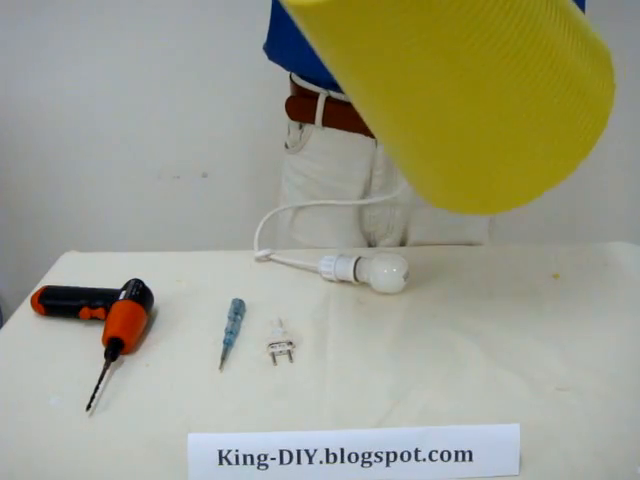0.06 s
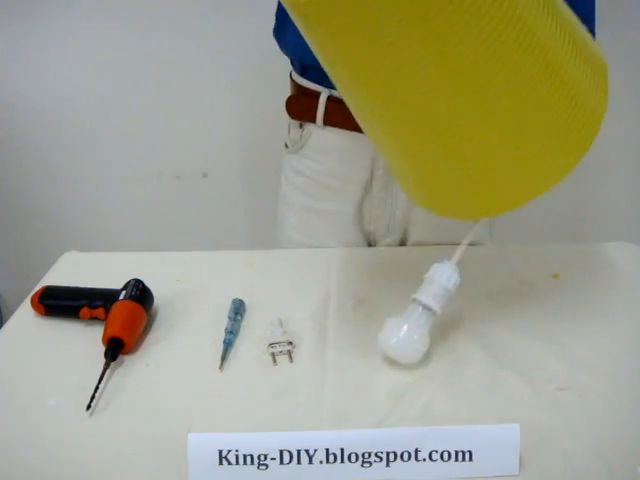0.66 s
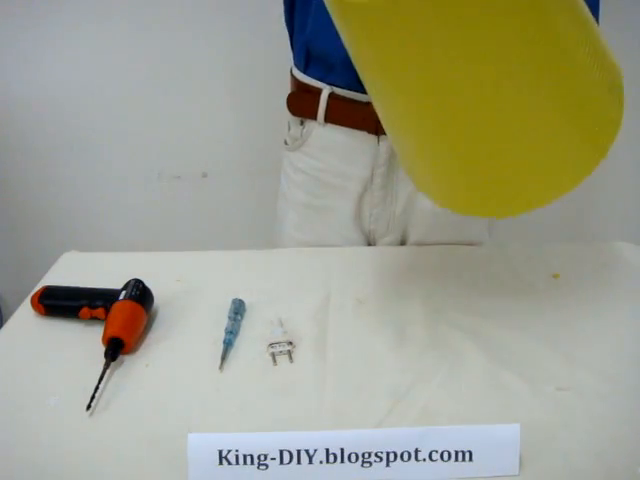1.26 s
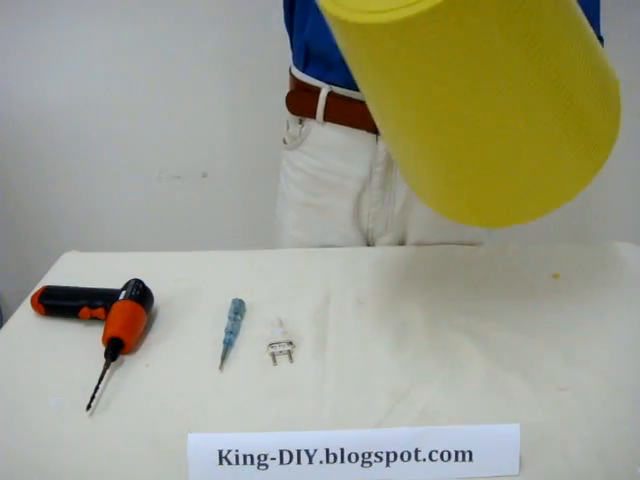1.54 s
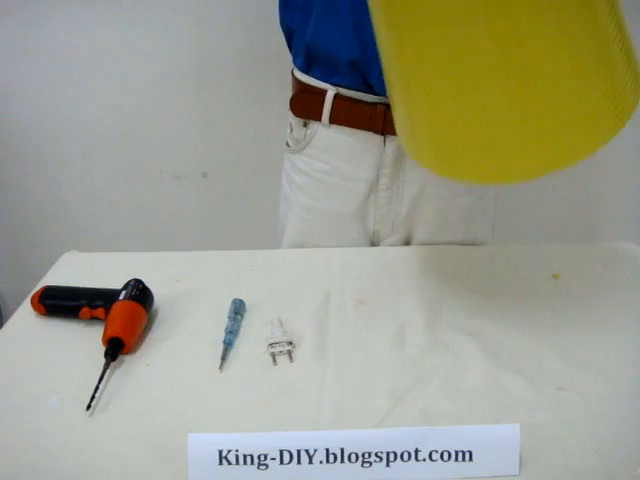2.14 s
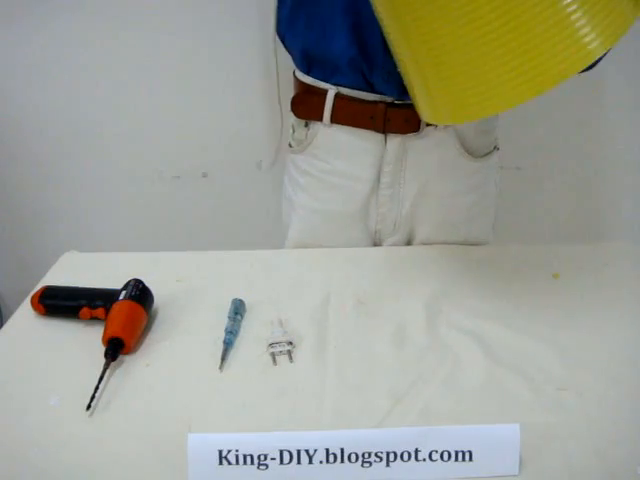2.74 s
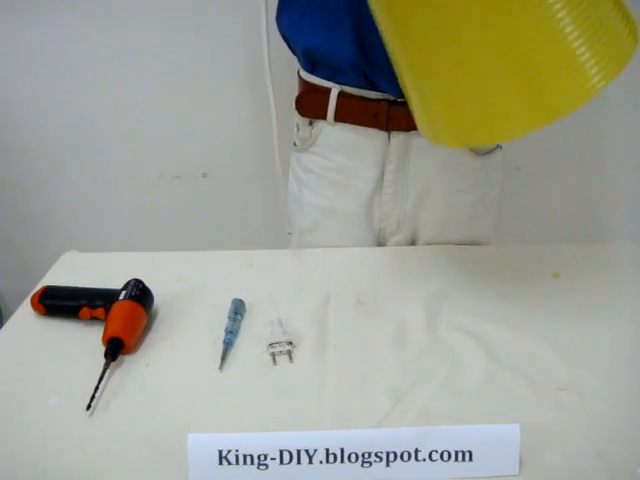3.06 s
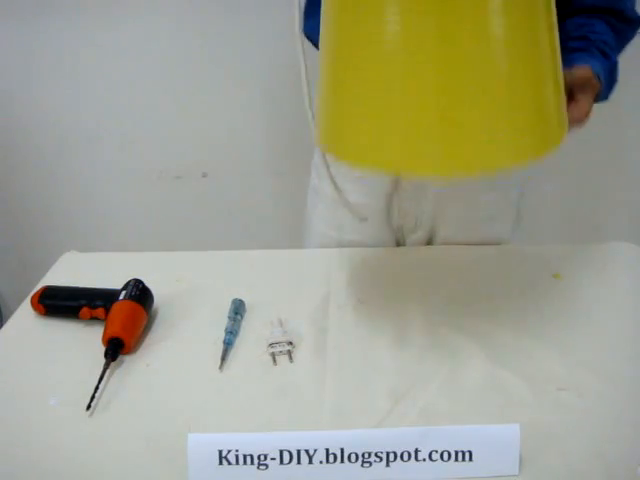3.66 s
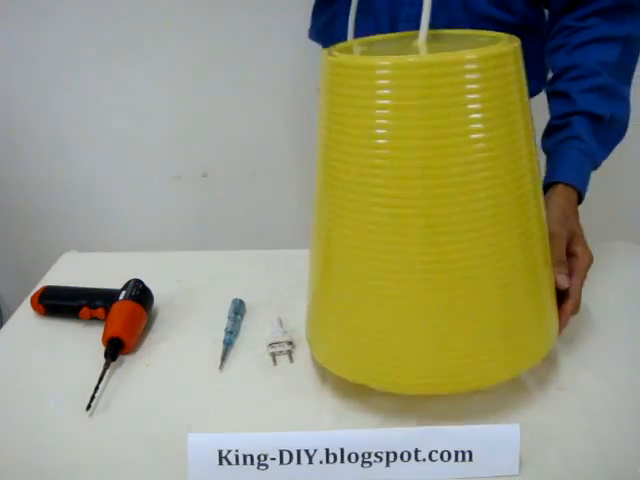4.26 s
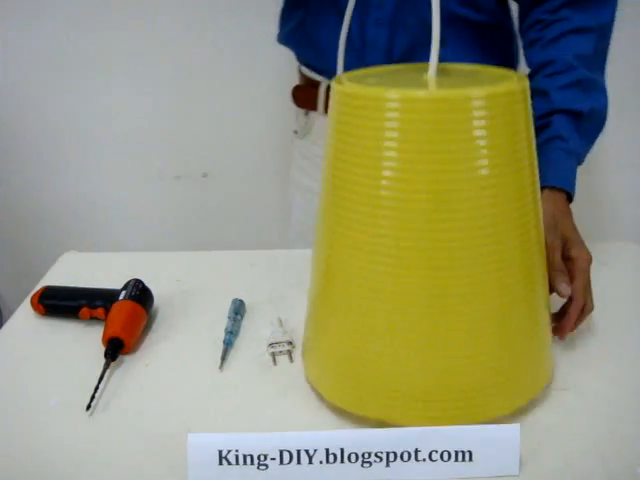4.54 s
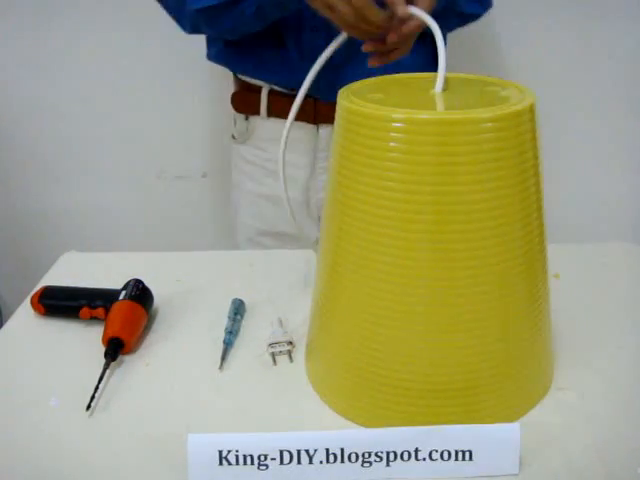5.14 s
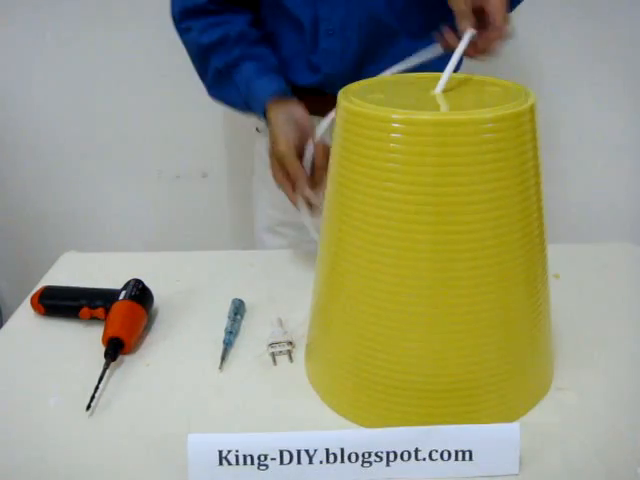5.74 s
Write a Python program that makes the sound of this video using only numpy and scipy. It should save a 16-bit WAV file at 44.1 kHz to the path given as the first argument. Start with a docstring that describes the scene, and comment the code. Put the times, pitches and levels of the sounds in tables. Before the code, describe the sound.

A cord scrapes and judders through a hole in a plastic basket while a dangling bulb clacks against the wall. The scraping stops, then briefly returns amid more knocks as the basket is turned. It lands on its rim on a covered table with a dull, hollow boom, followed by faint brushing. The room is small and slightly echoing, with constant microphone hiss and a faint hum.

```python
"""A lamp cord pulled through a plastic basket

In a small, hard room a cord rasps by stick-slip friction through the base of a large plastic basket.
The lamp slides off the table and knocks about inside, exciting the modes of the shell and the bulb.
Hands turn the basket over and set it on its rim on the cloth-covered table, where the trapped air
booms and sleeves brush by. A small camera hisses throughout, over a faint hum."""
import sys
import numpy as np
from scipy import signal
from scipy.fft import rfft, irfft
from scipy.io import wavfile

SR = 44100
rng = np.random.default_rng(int(sys.argv[2]) if len(sys.argv) > 2 else 0)


def wav_out(sig):
    """Save sig, one row per channel (or a flat mono array), as 16-bit PCM at SR to the path in sys.argv[1]."""
    wavfile.write(sys.argv[1], SR, np.round(np.clip(np.atleast_2d(sig).T, -1, 1) * 32767).astype(np.int16))


N = 264600
TIME = np.arange(N) / SR

# spectrum of plastic struck or brushed: (frequency [Hz], level [dB])
CONTACT_SPECTRUM = [(100, -36), (600, -6.5), (1200, 0.5), (2000, -5.5), (2700, -3), (3700, -4.5),
                    (4900, -6), (6500, -11.5), (10000, -14.5)]
SLIDE_START_S, SLIDE_LENGTH_S = 0.242, 0.21  # the lamp slides, then lifts off
DRAG_LENGTH_S = 1.838  # between pulls the cord creeps on until it is through


def gain_of(db):
    """Amplitude ratio of a level in decibels."""
    return 10 ** (np.asarray(db) / 20)


def unit_rms(x):
    """Normalisation to an rms of one."""
    return x / np.sqrt(np.mean(x ** 2) + 1e-20)


def curve_at(points, hz):
    """Interpolation of (frequency [Hz], value) points on a logarithmic frequency axis."""
    frequency, value = np.transpose(points)
    return np.interp(np.log(hz + 1), np.log(frequency + 1), value)


def add(mix, s, sound):
    """Superposition of a sound on the mix from time s."""
    part = mix[max(round(s * SR), 0):][:len(sound)]
    part += sound[:len(part)]


def colour(x, spectrum, size=2048):
    """Spectral shaping by a minimum-phase filter of unit energy."""
    log_gain = np.log(gain_of(curve_at(spectrum, abs(np.fft.fftfreq(size, 1 / SR)))))
    taps = np.fft.ifft(np.exp(np.conj(signal.hilbert(log_gain)))).real[:size // 2]
    return signal.fftconvolve(x, taps / np.linalg.norm(taps))[:len(x)]


def resonate(x, hz, width_hz):
    """Forced resonance with steep skirts: two band-passes in series, scaled to unit rms."""
    b, a = signal.iirpeak(hz, hz / width_hz, SR)
    return unit_rms(signal.lfilter(b, a, signal.lfilter(b, a, x)))


def ringing(x, modes):
    """Free vibration: each mode excited by x decays exponentially."""
    t = np.arange(SR) / SR
    ring = sum(gain_of(db) * np.exp(-np.log(1000) * t / t60) * np.cos(2 * np.pi * hz * t)
               for hz, db, t60 in modes)
    return signal.fftconvolve(x, ring)[:N]


def swell(t, peak_s):
    """A critically damped pulse, reaching one at peak_s."""
    u = np.maximum(t, 0) / peak_s
    return u * np.exp(1 - u)


def unsteady(span_s, depth_db):
    """Random amplitude modulation: a gain that wanders over span_s."""
    window = signal.windows.hann(int(span_s * SR))
    drift = unit_rms(signal.fftconvolve(rng.standard_normal(N), window, "same"))
    return unit_rms(gain_of(depth_db * drift))


def stroke(start_s, length_s, release_s=0.056):
    """Envelope of a sliding motion: acceleration, steady speed, exponential coasting."""
    t = TIME - start_s
    attack_s = 0.11 * np.sqrt(length_s)
    attack = np.sin(np.pi / 2 * np.clip(t / attack_s, 0, 1)) ** 2
    return attack * np.exp(-np.maximum(t - length_s, 0) / release_s)


def slips(per_s, spread_db, smooth=1.0):
    """Stick-slip friction: random impulses of uneven size over a smooth rub."""
    size = gain_of(spread_db * np.minimum(rng.exponential(1, N), 4))
    train = size * rng.choice([-1, 1], N) * (rng.random(N) < per_s / SR)
    return unit_rms(unit_rms(train) + smooth * rng.standard_normal(N))


def pulling(creep_db=-43):
    """Friction grows with sliding speed; the strongest pull sets the rasp and groan envelopes."""
    # pulls of the cord: (start [s], length [s], rasp [dB], groan [dB], gain in speed [dB/s])
    pulls = [(-.06, 0.077, -29.5, -36, -9), (0.274, .36, -28.5, -60, 6.5), (0.638, 0.44, -32, -36, 3.5),
             (1.251, 0.16, -34, -43, 2), (1.34, 0.32, -37, -26, -11.5), (3.065, 0.074, -36, -38, 54),
             (3.176, 0.13, -32.5, -45, -16), (3.52, 0.025, -37, -40, -5)]
    rasp = gain_of(creep_db) * stroke(-0.075, DRAG_LENGTH_S)
    groan = np.zeros(N)
    for start_s, length_s, rasp_db, groan_db, db_per_s in pulls:
        speed = stroke(start_s, length_s) * gain_of(db_per_s * np.clip(TIME - start_s, 0, length_s))
        rasp = np.maximum(rasp, gain_of(rasp_db) * speed)
        groan = np.maximum(groan, gain_of(groan_db) * speed)
    return rasp, groan


def cord():
    """Stick-slip friction forces vibration: the hole's edge rasps, the wall judders, the base groans."""
    # the cord rubbing the edge: (frequency [Hz], level [dB])
    rasp_spectrum = [(70, -39), (160, -15.5), (400, -1), (850, -1), (1250, 7.5), (1700, 4), (2400, -3.5),
                     (3300, -10.5), (4000, -15.5), (5300, -23.5), (7500, -35.5), (10000, -59)]
    # the bright fizz of fast sliding: (frequency [Hz], level [dB])
    fizz_spectrum = [(300, -36), (1200, -9), (2300, 3), (3200, 2.5), (3900, -11), (4500, -10.5),
                     (5500, -15.5), (10000, -22.5)]
    rasp, groan = pulling()
    judder = rasp ** 0.53 * unsteady(span_s=0.038, depth_db=3.5)  # grows more slowly than the rasp
    grip = unsteady(span_s=0.033, depth_db=1.2)  # the cord catches and lets go
    drive = grip * slips(per_s=630, spread_db=0, smooth=0.69)
    fizz = grip * colour(slips(per_s=530, spread_db=-4), fizz_spectrum)
    hanging = stroke(SLIDE_START_S + SLIDE_LENGTH_S, DRAG_LENGTH_S)
    sway = hanging * resonate(drive, hz=125, width_hz=20)  # the hanging lamp shakes the basket
    edge = colour(drive, rasp_spectrum)
    wall = resonate(drive, hz=276.4, width_hz=69)
    base = resonate(drive, hz=484, width_hz=313) + gain_of(-8.5) * resonate(drive, hz=1084, width_hz=260)
    return (gain_of(-1.5) * rasp * edge
            + rasp ** 2 * (gain_of(21) * fizz + gain_of(12) * sway)  # faster is brighter and shakier
            + gain_of(-20.5) * judder * wall
            + gain_of(-6.5) * groan * base)


def hiss(broadband_db=-41):
    """Stationary noise of room and camera: a broad spectrum with three narrow bands standing out."""
    # the noise floor: (frequency [Hz], level [dB])
    floor_spectrum = [(20, -14), (60, -16), (110, -4.5), (200, -1.5), (300, 3), (600, 1), (850, -0.5),
                      (1250, 5), (1600, 4.5), (2100, -10), (2800, -10), (4200, -17.5), (7800, -19),
                      (10200, -29)]
    # bands in the camera's hiss: (centre [Hz], width [Hz], rms level [dB])
    bands = [(3364, 323, -51.5), (6000, 320, -63.5), (9250, 810, -54)]
    hz = np.fft.rfftfreq(N, 1 / SR)
    layers = [(broadband_db, gain_of(curve_at(floor_spectrum, hz)))]
    layers += [(db, np.exp(-2 * ((hz - centre_hz) / width_hz) ** 2)) for centre_hz, width_hz, db in bands]
    return sum(gain_of(db) * unit_rms(irfft(rfft(rng.standard_normal(N)) * shape, N))
               for db, shape in layers)


def hum(hz=300, level_db=-60):
    """A faint tone in the room wavers by slow amplitude modulation."""
    waver = unsteady(span_s=0.3, depth_db=2.5)
    return gain_of(level_db) * unit_rms(waver * np.sin(2 * np.pi * hz * TIME))


def flex(t, hz, peak_s=0.0052, width_s=0.0035):
    """Heavily damped bending: the whole wall swings for a few cycles."""
    # bending modes: (frequency / wall pitch [ratio], level [dB])
    wall_modes = [(1, 0), (1.95, -21.5), (2.7, -15.5)]
    wall = sum(gain_of(db) * np.sin(2 * np.pi * hz * ratio * t) for ratio, db in wall_modes)
    return -np.exp(-((t - peak_s) / width_s) ** 2) * wall


def bumps():
    """A soft impact excites only the wall's low bending modes."""
    # cord and hands against the wall: (time [s], level [dB], wall pitch [Hz])
    soft_contacts = [(0.024, -24, 265), (0.218, -30, 290), (.317, -20.5, 297), (.608, -21, 292),
                     (.70, -19.5, 310), (.844, -13.5, 346), (.853, -16.5, 342), (1.421, -22.5, 286),
                     (1.663, -26, 317), (3.08, -26.5, 278), (3.1173, -16, 284), (3.208, -19, 305),
                     (3.23, -8, 320), (3.262, -26, 325), (3.647, -35.5, 290), (3.926, -29, 294)]
    out, t = np.zeros(N), np.arange(SR // 10) / SR
    for s, db, hz in soft_contacts:
        add(out, s, gain_of(db) * flex(t, hz))
    return out


def slide(level_db=-29):
    """Friction of the lamp on the cloth drives a resonance of the table."""
    rumble = resonate(slips(per_s=300, spread_db=-3), hz=300.4, width_hz=52)
    return gain_of(level_db) * stroke(SLIDE_START_S, SLIDE_LENGTH_S) * rumble


def clack(t, hz, tilt_db_per_octave):
    """Local modes of stiff plastic ring for milliseconds; a harder impact favours the high ones."""
    # modes around the contact: (frequency / clack pitch [ratio], level [dB], time to peak [s])
    panel_modes = [(0.459, -9, 0.0011), (0.803, -10.5, 0.0033), (0.998, -3, 0.0016), (1.26, -9.5, 0.0028),
                   (1.62, -14, 0.0011)]
    return sum(gain_of(db + tilt_db_per_octave * np.log2(ratio)) * swell(t, peak_s) ** 2
               * np.sin(2 * np.pi * hz * ratio * t) for ratio, db, peak_s in panel_modes)


def knocks(held_wall_hz=298.4, standing_wall_hz=244, standing_from_s=4.3):
    """A hard impact excites a wide band: it cracks, clacks, rebounds once and bends the wall."""
    # hard contacts on the shell:
    # (time [s], clack [dB], clack pitch [Hz], crack [dB], hardness tilt [dB/octave], wall flex [dB])
    hard_contacts = [(0.554, -15.5, 1450, -36, 5, -20.5), (0.7951, -5.5, 1573, -24.5, -2.5, -16),
                     (0.9793, -10.5, 1494, -29, 3.5, -10.5), (1.163, -21.5, 1350, -17.5, -1.5, -20),
                     (1.309, -46, 1420, -31.5, 10, -42), (2.013, -25, 1940, -29.5, 0, -29),
                     (2.5748, -31, 1910, -35, -2, -32), (2.9552, -26, 2550, -35, 1.5, -7.5),
                     (3.2564, -21, 1100, -20, -2.5, -36), (3.4882, -16, 1517, -19.5, -2.5, -29),
                     (3.4895, -17.5, 2533, -25.5, -0.5, -16.5), (3.533, -25.5, 2560, -26, -2.5, -27),
                     (3.8219, -25.5, 1600, -32.5, 0, -43), (4.5612, -19, 1665, -23.5, -1, -26),
                     (4.576, -32, 2230, -27.5, -3, -30)]
    # the strike and its softer, higher rebound: (delay [s], level [dB], pitch [ratio])
    touches = [(0, 0, 1), (0.0024, -9.5, 1.28)]
    out, t = np.zeros(N), np.arange(SR // 10) / SR
    for s, clack_db, clack_hz, crack_db, tilt, flex_db in hard_contacts:
        spectrum = [(hz, db + tilt * np.log2(hz / clack_hz)) for hz, db in CONTACT_SPECTRUM]
        for delay_s, touch_db, pitch in touches:
            crack = colour(swell(t, peak_s=0.001) * rng.choice([-1, 1], len(t)), spectrum)
            touch = gain_of(clack_db) * clack(t, clack_hz * pitch, tilt) + gain_of(crack_db) * crack
            add(out, s + delay_s, gain_of(touch_db) * touch)
        wall_hz = held_wall_hz if s < standing_from_s else standing_wall_hz  # lower on the table
        add(out, s, gain_of(flex_db) * flex(t, wall_hz))
    return out


def bulb():
    """Impulses from touching the wall set the glass bulb in thin, free vibration."""
    # modes of bulb and holder ring: (frequency [Hz], level [dB], T60 [s])
    bulb_modes = [(2790, 0, .22), (2939, -6, .15), (4500, -12, .15), (4880, -11, .15)]
    # taps on the glass: (time [s], level [dB])
    taps = [(1.165, -36.5), (3.257, -38), (3.49, -38)]
    impulses = np.zeros(N)
    for s, db in taps:
        add(impulses, s, gain_of([db]))
    return ringing(impulses, bulb_modes)


def landing(scuff_s=0.0053):
    """Cavity resonance: air trapped under the rim booms, while the cloth damps the contact."""
    # the rim lands and rocks to rest: (time [s], boom [dB], pitch [Hz], time to peak [s], scuff [dB])
    rim_contacts = [(4.654, -19, 193, 0.0082, -29.5), (4.675, -33, 176, 0.0048, -27),
                    (4.729, -34, 203, 0.0067, -34), (4.753, -32, 148, 0.006, -54),
                    (4.815, -47, 171.5, 0.029, -57)]
    # the dull scuff of rim on cloth: (frequency [Hz], level [dB])
    scuff_spectrum = [(30, -49), (60, -25), (95, 1.5), (300, 2.5), (700, -4.5), (1200, -18), (2500, -21),
                      (8000, -52)]
    out, t = np.zeros(N), np.arange(SR // 4) / SR
    for s, boom_db, hz, peak_s, scuff_db in rim_contacts:
        boom = np.sqrt(swell(t, peak_s)) * np.sin(2 * np.pi * hz * t)
        scuff = colour(np.sqrt(swell(t, scuff_s)) * rng.standard_normal(len(t)), scuff_spectrum)
        add(out, s, gain_of(boom_db) * boom + gain_of(scuff_db) * scuff)
    return out


def sleeves():
    """Friction noise swells and fades as cloth and skin brush the plastic."""
    # passes of sleeves and hands: (time of peak [s], half length [s], level [dB])
    brushes = [(4.68, 0.077, -44.5), (5.866, 0.063, -48.5)]
    envelope = sum(gain_of(db) * np.exp(-((TIME - s) / half_s) ** 2) for s, half_s, db in brushes)
    return envelope * colour(slips(per_s=510, spread_db=7), CONTACT_SPECTRUM)


def basket(x, coupling_db=-64):
    """Modal coupling: every touch leaves the whole basket ringing faintly."""
    # modes of the shell and its air: (frequency [Hz], level [dB], T60 [s])
    basket_modes = [(122.8, -10, .8), (176.8, 3.5, 0.58), (304, -8.5, 0.21), (343.8, 9, 0.23),
                    (453.5, 0, 0.64), (513, 1, 0.46), (607, -21, 0.37), (681, -1.5, 0.38),
                    (853, -4.5, 0.62), (1004, -8.5, 0.33), (990, 0.5, 0.21)]
    return x + gain_of(coupling_db) * ringing(x, basket_modes)


def room(x, build_s=0.0073, reflections_per_s=3000):
    """Reverberation: dense reflections from bare walls decay at a different rate in each band."""
    # (frequency [Hz], T60 [s]) and (frequency [Hz], reverberant level [dB])
    t60 = [(120, 1.0), (320, 0.53), (900, 0.88), (2500, 0.53), (8000, 0.82)]
    wet_db = [(120, -16.0), (320, -3.5), (900, -2.0), (2500, -8.0), (8000, -2.0)]
    reflections = rng.choice([-1., 1.], SR) * (rng.random(SR) < reflections_per_s / SR)
    hz, t, bands = signal.stft(unit_rms(reflections), SR, nperseg=256)
    rate = np.log(1000) / curve_at(t60, hz)[:, None]
    decay = np.exp(-rate * t) * np.sqrt(2 * rate / SR)  # unit energy in each band
    bands = bands * decay * gain_of(curve_at(wet_db, hz))[:, None]
    build_up = np.minimum(TIME[:SR] / build_s, 1) ** 2
    tail = signal.istft(bands, SR, nperseg=256)[1][:SR] * build_up
    return x + signal.fftconvolve(x, tail)[:N]


def scene():
    """Superposition of the basket, lamp and sleeves in their room, over hiss and hum."""
    shell = basket(knocks() + bumps() + landing() + cord())
    direct = shell + bulb() + slide() + sleeves()
    return (room(direct) + hiss() + hum())[None]


def record(dry, cutoff_hz=10200):
    """Band limiting: the camera acts as a steep low-pass filter."""
    low_pass = signal.firwin(401, cutoff_hz, window=("kaiser", 7), fs=SR)
    return signal.oaconvolve(dry, low_pass[None], "same")


dry = scene()
out = record(dry)
wav_out(out)
```